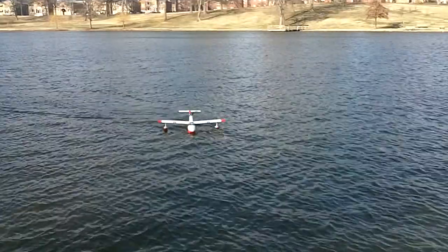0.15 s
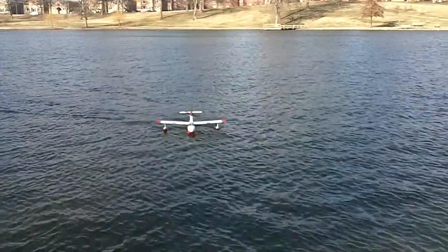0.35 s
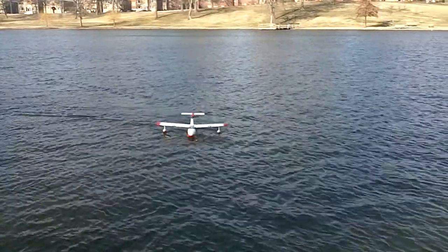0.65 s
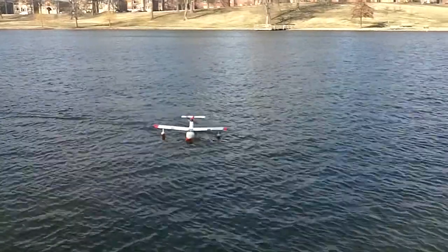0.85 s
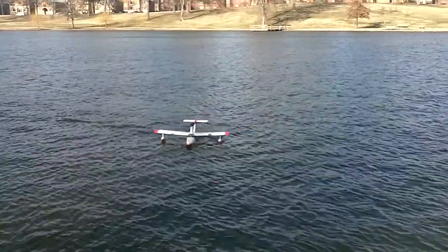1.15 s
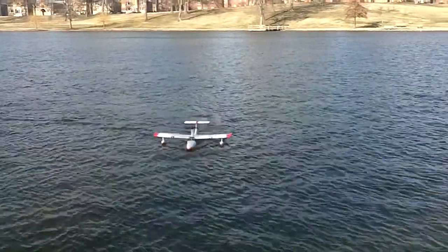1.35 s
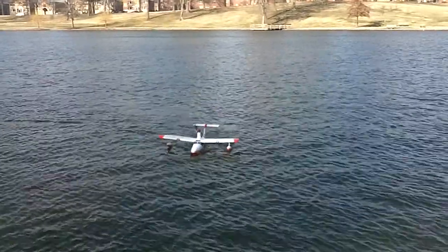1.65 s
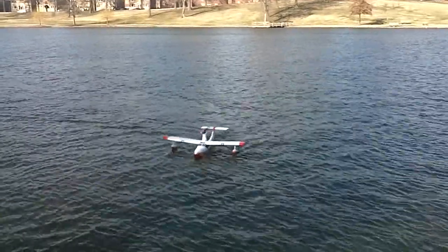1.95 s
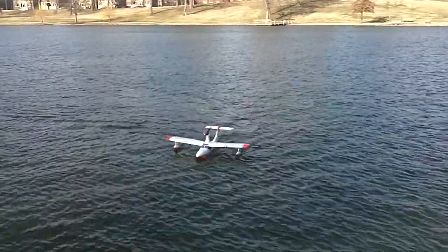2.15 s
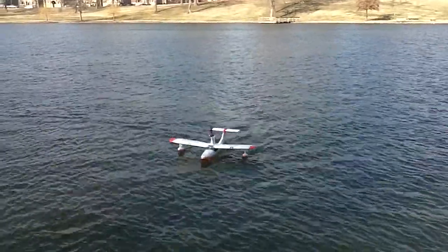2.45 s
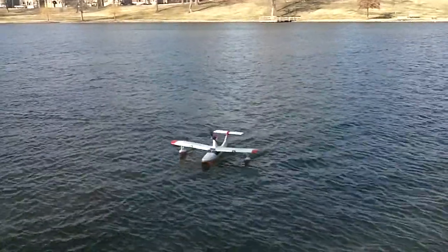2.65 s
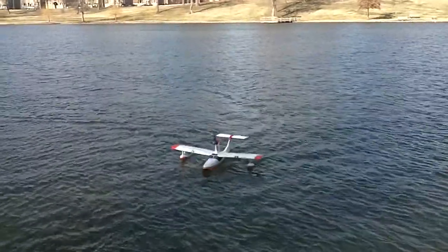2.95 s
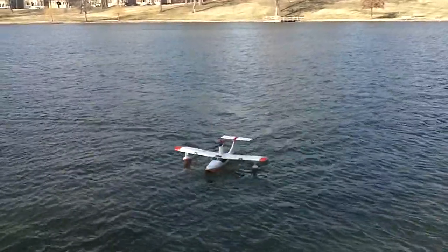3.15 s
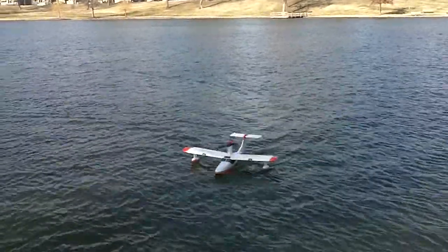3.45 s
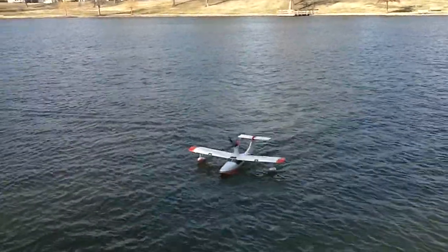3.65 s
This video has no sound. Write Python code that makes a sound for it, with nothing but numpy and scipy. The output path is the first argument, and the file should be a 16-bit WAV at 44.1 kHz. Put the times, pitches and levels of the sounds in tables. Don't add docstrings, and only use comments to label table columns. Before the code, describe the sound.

A small electric model seaplane taxis on a lake, its thin fixed high whistle and fluttering propeller hiss easing down twice, while loud low wind rumble and thumps buffet the microphone on the bank.

```python
import sys
import numpy as np
from scipy import signal
from scipy.fft import rfft, irfft
from scipy.io import wavfile

SR = 44100
rng = np.random.default_rng(int(sys.argv[2]) if len(sys.argv) > 2 else 0)


def digitize_waveform(pressure):
    field = np.atleast_2d(pressure).T
    bounded = np.clip(field, -1, 1)
    quanta = np.round(bounded * 32767).astype(np.int16)
    wavfile.write(sys.argv[1], SR, quanta)


def level_to_linear(level):
    exponent = np.asarray(level, float) / 20
    return 10 ** exponent


N = 168021
TIME_S = np.arange(N) / SR


def in_time(rows):
    s, *columns = np.transpose(rows)
    return [np.interp(TIME_S, s, c) for c in columns]


def rms_one(x):
    return x / np.sqrt(np.mean(x ** 2) + 1e-20)


def drift(rate_hz):
    r = np.exp(-80 * np.pi * rate_hz / SR)
    slow = signal.lfilter([1], [1, -2 * r, r * r], rng.standard_normal(N // 40 + 2002))[2000:]
    return np.interp(np.arange(N) / 40, np.arange(len(slow)), rms_one(slow))


def resonate(x, hz, width_hz):
    r = np.exp(-np.pi * width_hz / SR)
    gain = (1 - r * r) / 2
    return signal.lfilter(np.array([1, 0, -1]) * gain, [1, -2 * r * np.cos(2 * np.pi * hz / SR), r * r], x)


def coloured(points, swing_db):
    hz, db = np.transpose(points)
    octave = np.log2(np.arange(N // 2 + 1) * SR / N + 1e-3)
    outside = np.maximum(np.log2(hz[0]) - octave, octave - np.log2(hz[-1]))
    slope_db = 30 * np.maximum(outside, 0)
    shaped = rfft(rng.standard_normal(N)) * level_to_linear(np.interp(octave, np.log2(hz), db) - slope_db)
    scale = np.sqrt(np.mean(irfft(shaped, N) ** 2))
    out = np.zeros(N)
    for centre in np.arange(np.floor(np.log2(hz[0])) - 1, np.log2(hz[-1]) + 1, .5):
        band = irfft(shaped * np.maximum(1 - 2 * abs(octave - centre), 0), N)
        out += level_to_linear(swing_db(2 ** centre)) * band
    return out / scale


def clicks(rows):
    out = np.full(N, 1e-18)
    for s, db, *_ in rows:
        out[int(s * SR)] = level_to_linear(db)
    return out


# (time [s], level [dB])
WIND_LEVEL = [(0.0, -25), (0.54, -25.5), (0.73, -26.5), (1.25, -21), (1.62, -20), (1.65, -23.5),
              (2.27, -27.5), (2.32, -27.5), (2.38, -23.5), (2.56, -28), (2.67, -26), (2.8, -30),
              (2.92, -22.5), (3.0, -32), (3.07, -25.5), (3.37, -28), (3.4, -25.5), (3.81, -24)]
# (frequency [Hz], level [dB])
WIND_COLOUR = [(8.8, -17), (15, 4.5), (27, 1.5), (69, -5.5), (134, -11.5), (224, -20.5), (362, -27),
               (380, -30.5), (700, -48.5), (910, -52), (1540, -120)]


def wind_rumble():
    level_db, = in_time(WIND_LEVEL)
    lumps = drift(25)
    brighter_db = 0.13 * (level_db - level_db.mean()) + 0.29 * lumps

    def swing_db(hz):
        octaves_up = np.clip(np.log2(hz / 40), 0, 3.0)
        return octaves_up * brighter_db + 1.0 * drift(3.9)
    return level_to_linear(level_db - 1.5) * coloured(WIND_COLOUR, swing_db)


# (time [s], peak level [dB])
HEAVES = [(0.07, -19), (0.192, -24), (0.342, -20.5), (0.449, -16.5), (0.534, -17), (0.879, -14),
          (0.951, -17), (1.034, -10), (1.135, -12.5), (1.275, -5.5), (1.396, -9.5), (1.53, -20.5),
          (1.585, -15.5), (1.781, -16.5), (2.027, -17), (2.375, -18), (2.653, -18.5), (2.907, -24),
          (3.295, -20), (3.363, -15.5), (3.597, -16), (3.795, -15.5)]


def wind_heaves():
    heave_hz, heave_s, heave_db = 64.6, .011, -4
    out = np.zeros(N)
    for (s, db), (pitch, phase) in zip(HEAVES, rng.uniform(-1.13, 1, (len(HEAVES), 2))):
        since = TIME_S - s
        swell = level_to_linear(db + heave_db) * np.exp(-(since / heave_s) ** 2 / 2)
        out += swell * np.cos(2 * np.pi * heave_hz * 1.5 ** pitch * since + np.pi * phase)
    return out


# (time [s], peak level [dB], brightness [octaves above 200 Hz])
BUFFETS = [(0.089, -18, 0.29), (0.274, -26, 0.084), (0.334, -28, 0.49), (0.348, -20, 0.13),
           (0.483, -23.5, 0.52), (0.505, -23, 0.69), (0.644, -30.5, 0.18), (0.744, -21, 0.04),
           (0.796, -23.5, 0.1), (0.811, -31, 0.17), (0.829, -21.5, 0.37), (0.91, -23, 0.15),
           (1.038, -25, 0.14), (1.047, -30, 0.28), (1.169, -30, 0.37), (1.313, -24, 0.11),
           (1.382, -17, 0.22), (1.396, -11, 1.17), (1.407, -14.5, 0.63), (1.444, -19, 1.32),
           (1.456, -21, 0.45), (1.477, -19.5, 0.21), (1.512, -20.5, 0.86), (1.588, -14, 0.48),
           (1.613, -18, 0.1), (1.623, -21, 0.33), (1.636, -26, 0.28), (1.656, -31, 0.084),
           (1.824, -26, 0.058), (2.022, -28, 0.2), (2.132, -23, 0.16), (2.145, -25.5, 0.42),
           (2.289, -26, 0.12), (2.376, -36, 1.1), (2.58, -30, 0.48), (2.708, -18.5, 0.25),
           (2.726, -29, 0.3), (2.754, -27, 0.32), (2.913, -27.5, 0.08), (2.948, -29, 0.088),
           (2.974, -27, 0.37), (3.348, -23.5, 0.11), (3.358, -13, 0.47), (3.371, -27, 0.1),
           (3.407, -25.5, 0.15), (3.587, -25.5, 0.54), (3.627, -26.5, 0.63), (3.645, -23.5, 0.18),
           (3.748, -23.5, 0.13), (3.788, -25.5, 0.092)]


def wind_buffets():
    buffet_s, low_hz, buffet_db, flutter_db, ring = 0.009, 70.7, 1, -8.5, 0.47
    t = np.arange(-2 * buffet_s, 6 * buffet_s, 1 / SR)
    envelope = np.exp(np.where(t < 0, 1.56 * t, -t) / buffet_s)
    out = np.zeros(N)
    for s, db, bright in BUFFETS:
        top_hz = 200 * 2 ** np.clip(bright, -1, 2.5)
        push = level_to_linear(flutter_db) * 0.11 * rng.standard_normal(len(t)) * envelope
        push[int(2 * buffet_s * SR)] += rng.choice([-1, 1])
        band = signal.butter(2, [low_hz, top_hz], "band", fs=SR, output="sos")
        dull = signal.butter(3, 1.62 * top_hz, fs=SR, output="sos")
        push = signal.sosfilt(dull, signal.sosfilt(band, push))
        push = push + ring * resonate(push, top_hz, top_hz / 3)
        i = int((s - 2 * buffet_s) * SR)
        out[i:i + len(t)] += (level_to_linear(db + buffet_db) * push / abs(push).max())[:N - i]
    return out


# (frequency [Hz], level [dB])
RIPPLE_COLOUR = [(260, -11), (450, -5), (621, -2.5), (896, -2), (1400, -6.5), (1580, -8), (2500, -13.5),
                 (3250, -96), (5500, -120)]


def ripples():
    return level_to_linear(-48.5) * coloured(RIPPLE_COLOUR, lambda hz: 0.93 * drift(9.8))


# (time [s], peak level [dB], frequency [Hz])
DROPS = [(1.69, -47, 2250), (1.827, -43, 1770), (1.876, -46, 2190), (1.957, -43, 1710), (2.159, -43, 2220),
         (3.08, -46, 2160), (3.446, -46, 2270)]


def drops():
    t60_s, attack_s = 0.057, 0.00038
    t = np.arange(int(.05 * SR)) / SR
    out = np.zeros(N)
    for s, db, hz in DROPS:
        i = int(s * SR)
        ring = np.sin(2 * np.pi * hz * t * (1 + 4 * t))
        out[i:i + len(t)] += level_to_linear(db - 60 * t / t60_s) * np.minimum(t / attack_s, 1) * ring
    return out


# (time [s], peak level [dB])
TICKS = [(.7695, -48), (1.6915, -60), (1.9918, -51.5), (2.394, -54), (2.5485, -51.5), (3.132, -58),
         (3.4465, -52)]


def spray():
    tick_s, tick_low_hz, tick_db = .0003, 1500, 14.5
    splash_s, splash_hz, splash_db = .006, 3900, 14.0
    hits = clicks(TICKS)
    ticks = signal.lfilter([1], [1, -np.exp(-1 / (tick_s * SR))], hits) * rng.choice([-1, 1], N)
    body = signal.lfilter([1], [1, -np.exp(-1 / (splash_s * SR))], hits) * rng.standard_normal(N)
    splash = level_to_linear(splash_db) * resonate(body, splash_hz, splash_hz / 2)
    high = signal.butter(1, tick_low_hz, "high", fs=SR, output="sos")
    return splash + level_to_linear(tick_db) * signal.sosfilt(high, ticks)


# (time [s], speed [turns per s])
SPEED = [(0, 103.4), (.3, 103.5), (.8, 104.1), (1.1, 104.6), (1.3, 104.3), (1.49, 104.3), (1.6, 97.7),
         (1.75, 93.5), (1.95, 91.4), (2.2, 90.1), (2.45, 90.9), (2.65, 90.7), (2.93, 90.3), (3.05, 85.2),
         (3.2, 81.5), (3.45, 79.0), (3.6, 78.5), (3.81, 77.6)]


def shaft_turn():
    speed, = in_time(SPEED)
    return 2 * np.pi * np.cumsum(speed) / SR


# (time [s], level [dB])
PROP_LEVEL = [(0.0, -25), (0.01, -52.5), (0.22, -48.5), (1.68, -48), (1.7, -49.5), (2.02, -50),
              (2.37, -52.5), (2.51, -50.5), (2.78, -49.5), (3.3, -58.5), (3.37, -55.5), (3.81, -55.5)]


def propeller_level():
    level_db, = in_time(PROP_LEVEL)
    return level_db


# (frequency [Hz], level [dB])
PROP_COLOUR = [(1710, -51), (2900, -3.5), (3100, -3), (3410, -7.5), (4420, -2.5), (4960, -5.5),
               (5300, -24.5), (6890, -50), (11700, -120)]
# (frequency [Hz], level [dB])
TOP_COLOUR = [(6300, -4), (7000, -11), (7600, -14.5), (8800, -19), (10000, -15), (12000, -17), (13500, -16),
              (15300, -18)]


def propeller(level_db, effort_db, throb):
    hiss = level_to_linear(level_db) * coloured(PROP_COLOUR, lambda hz: 1.4 * drift(6.9))
    top = level_to_linear(-65.5 + 0.62 * effort_db) * coloured(TOP_COLOUR, lambda hz: 2.0 * drift(2.7))
    return throb * (hiss + top)


# (frequency [Hz], width [Hz], lift of tones [gain], noise level [dB])
AIRFRAME = [(1630, 55, 2.2, -85), (4360, 180, 1.7, -81), (4720, 400, -.9, -95), (6005, 22, .6, -63.5),
            (6080, 170, .8, -65), (8740, 900, 0.068, -78), (3650, 300, .3, -95)]


def airframe(tones, effort_db, throb):
    out = np.zeros(N)
    for hz, width_hz, lift, noise_db in AIRFRAME:
        rough = resonate(rng.standard_normal(N), hz, width_hz)
        shake = rms_one(resonate(rough, hz, 2 * width_hz))
        out += lift * resonate(tones, hz, width_hz)
        out += level_to_linear(noise_db + 2.25 * effort_db + 1.2 * drift(5)) * throb * shake
    return out


# (time [s], whistle level [dB], side tone lift [dB], pylon buzz level [dB])
MOTOR_LEVELS = [(0, -54, 1.5, -56), (.3, -60, 0.5, -52), (.8, -58, 1, -61), (.98, -51.5, 2, -57.5),
                (1.12, -49.5, 3, -46), (1.3, -54.5, 1, -60.5), (1.49, -52.5, 7, -51), (1.6, -50.5, 3, -69),
                (2.2, -51, 7, -131), (2.45, -53, 3.5, -70), (2.65, -52, 6.5, -74), (2.93, -56, 5, -82),
                (3.1, -61.5, 2, -88), (3.45, -68, 3.5, -64), (3.6, -71, 5.5, -55.5), (3.81, -70, 6, -48.5)]
SIDE_ORDERS = [-42, -30, -29, -26, -21, -14, -7, -6, -1, 1, 2, 3, 4, 5, 6, 7, 8, 9, 10, 11, 12, 13, 14, 15,
               16, 21, 28, 42]
SIDE_DB = [-70, -83, -82, -75, -73, -84, -74, -83, -81, -74, -71, -76, -74, -73, -74, -75, -80, -85, -86,
           -87, -88, -88, -86, -88, -91, -83, -86, -89]
MAGNET_ORDERS = [18, 21, 42, 46, 63]
MAGNET_DB = [-72, -75, -63, -75, -78]


def motor(turn, effort_db, throb):
    whistle_hz, sag_hz_per_s = 8072.0, 3.0
    pylon_hz, pylon_width_hz = 5855, 180
    fade_db, wobble = 1.7, .3
    side_sweep = .13
    whistle_db, side_db, buzz_db = in_time(MOTOR_LEVELS)
    carrier = 2 * np.pi * (whistle_hz * TIME_S - sag_hz_per_s * TIME_S ** 2 / 2)

    lines = [(k * turn, db) for k, db in zip(MAGNET_ORDERS, MAGNET_DB)]
    for k, db in zip(SIDE_ORDERS, SIDE_DB):
        lines.append((carrier + k * turn + side_sweep * k * k, db + side_db))
    tones = np.zeros(N)
    for phase, db in lines:
        tones += level_to_linear(db + 1 + fade_db * drift(4.4)) * np.sin(phase + wobble * drift(7.2))

    buzz = np.sin(56 * turn + wobble * drift(15))
    buzz += np.sin(carrier - 28 * turn + 2 * wobble * drift(25))
    for _ in range(2):
        buzz = resonate(buzz, pylon_hz, pylon_width_hz)
    buzz = level_to_linear(buzz_db + 3.0 + 2.0 * drift(32)) * buzz

    whistle = level_to_linear(whistle_db + 3 + .6 * drift(4)) * np.sin(carrier + .1 * drift(10))
    return tones + buzz + whistle + airframe(tones, effort_db, throb)


def scene():
    background = wind_rumble() + wind_heaves() + wind_buffets() + ripples() + drops() + spray()
    turn, level_db = shaft_turn(), propeller_level()
    effort_db = level_db - level_db.mean()
    throb = 1 + 0.27 * np.cos(turn)
    mono = background + propeller(level_db, effort_db, throb) + motor(turn, effort_db, throb)
    return np.stack([mono, mono])


# (frequency [Hz], width [Hz])
GAPS = [(2712, 660), (5505, 180), (5505, 170), (7840, 36), (10950, 700), (10950, 1000)]


def recorder_gaps(x):
    for hz, width_hz in GAPS:
        x = x - resonate(x, hz, width_hz)
    return x


def roll_off(x):
    return signal.sosfilt(signal.butter(12, 15760, fs=SR, output="sos"), x)


def record(dry):
    edge_s, cutoff_hz = .008, 15050
    one_sided_hz = 486
    to_edge = np.minimum(np.arange(N), np.arange(N)[::-1])
    fade = np.sin(np.pi / 2 * np.minimum(to_edge / (edge_s * SR), 1)) ** 2
    x = recorder_gaps(dry[0] * fade)
    x = signal.sosfilt(signal.ellip(4, .5, 13, cutoff_hz, fs=SR, output="sos"), x)
    late = np.append(0, x[:-1])
    treble = signal.butter(1, 1.8 * one_sided_hz, "high", fs=SR, output="sos")
    side = signal.sosfiltfilt(treble, late - x) / 2
    mix = (late + x) / 2 + side * [[1], [-1]]
    return roll_off(mix)


dry = scene()
out = record(dry)
digitize_waveform(out)
```